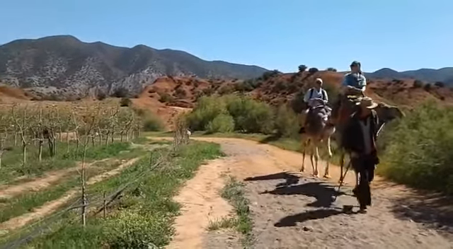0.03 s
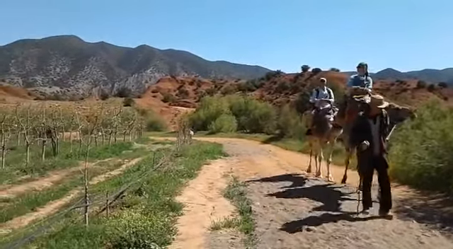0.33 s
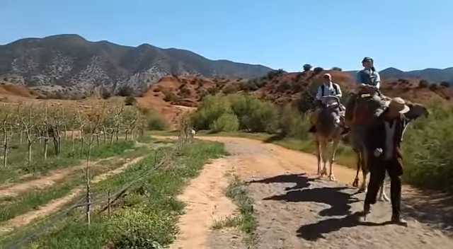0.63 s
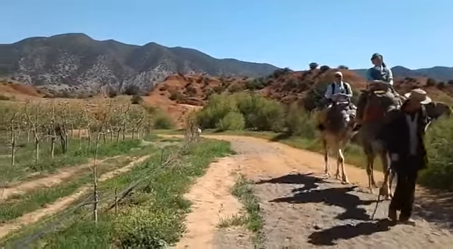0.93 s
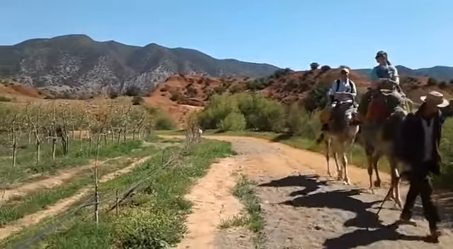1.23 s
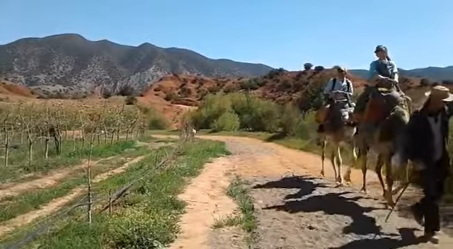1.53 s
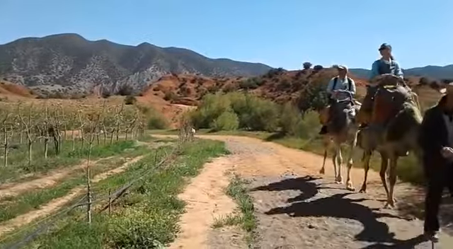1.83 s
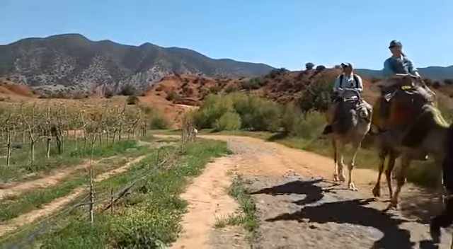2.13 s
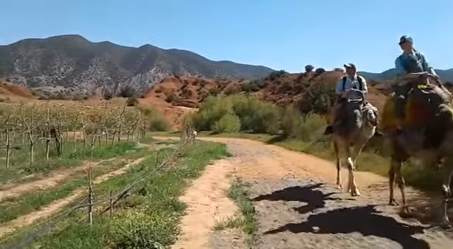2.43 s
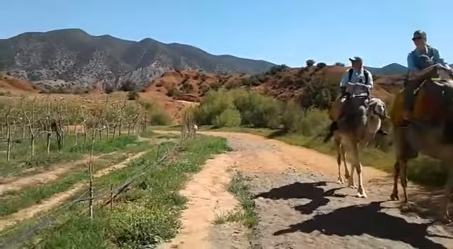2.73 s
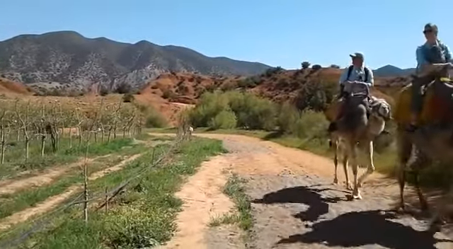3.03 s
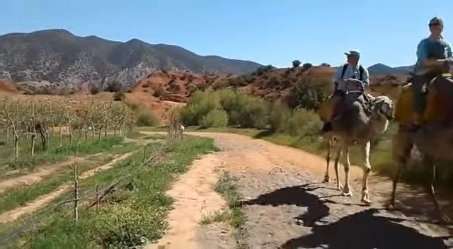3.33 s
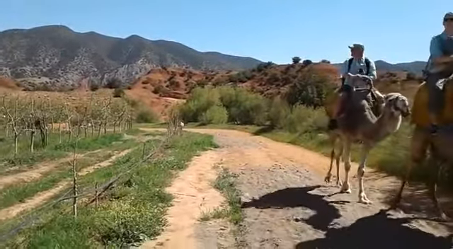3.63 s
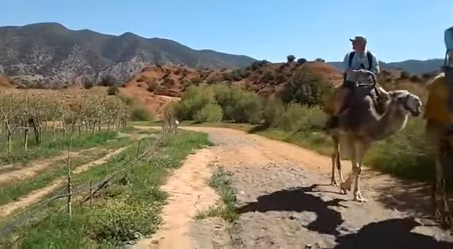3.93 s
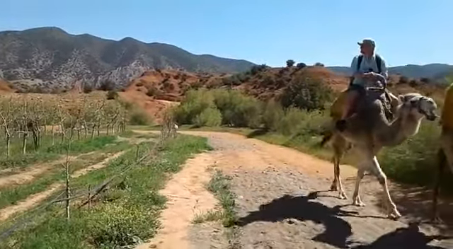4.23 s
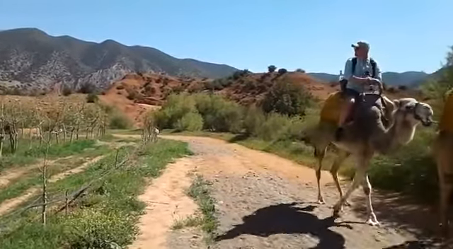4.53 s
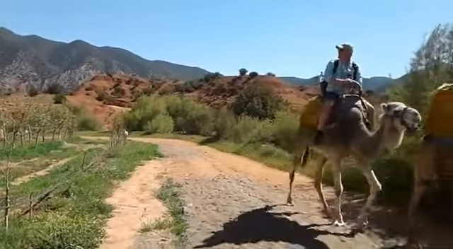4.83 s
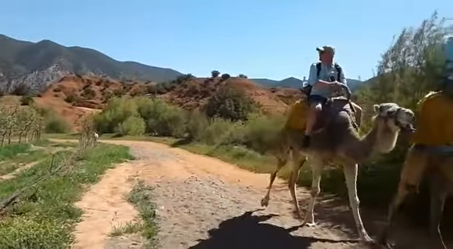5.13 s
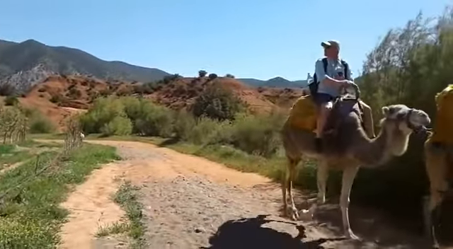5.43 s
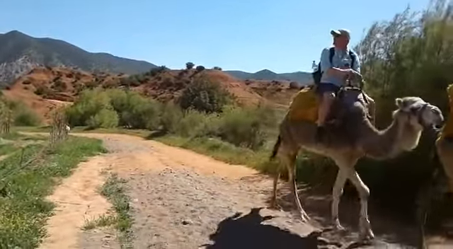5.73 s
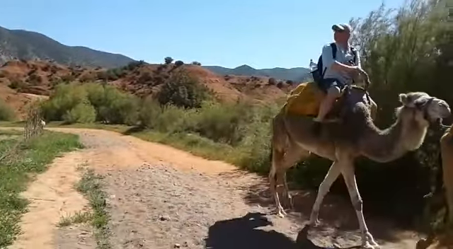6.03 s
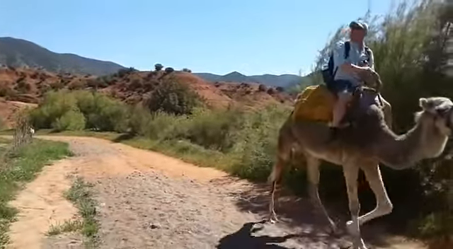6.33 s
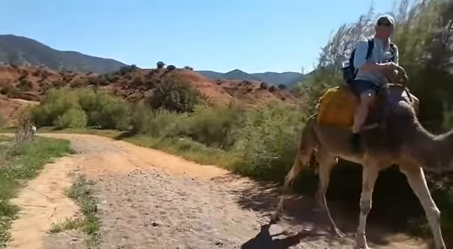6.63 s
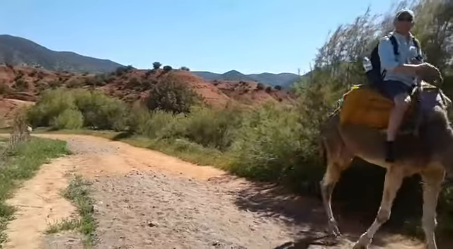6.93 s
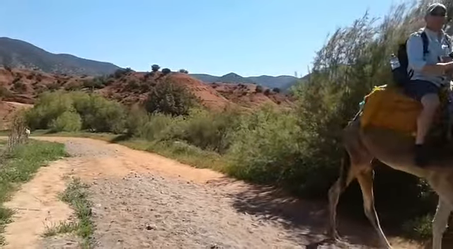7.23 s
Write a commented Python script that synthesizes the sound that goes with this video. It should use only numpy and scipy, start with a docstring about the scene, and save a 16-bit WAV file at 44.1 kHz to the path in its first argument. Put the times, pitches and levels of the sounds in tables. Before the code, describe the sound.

Camels and a person walk on a stony track with short crunching steps, while a small bird chirps and light wind rumbles.

```python
"""Camels and a man on foot walk past on a stony track in open country. Each footfall loads stones, gravel
and sand, whose many small impacts excite damped resonances; trapped stones rattle and pebbles snap.
In the bushes a finch sings a fast jingle of frequency sweeps from the two sides of its syrinx.
Far off a frog or toad croaks in amplitude-modulated pulses, and over a faint hush of air
the turbulent pressure of gusts rumbles on the microphone."""
import sys
import numpy as np
from scipy import signal
from scipy.fft import rfft, irfft
from scipy.io import wavfile
from scipy.ndimage import uniform_filter1d

SR = 44100
rng = np.random.default_rng(int(sys.argv[2]) if len(sys.argv) > 2 else 0)


def wav_record(signal):
    """Record a signal, one row per channel, as 16-bit PCM in the file named by sys.argv[1]."""
    frames = np.transpose(np.atleast_2d(signal))
    bounded = np.clip(frames, -1, 1)
    # unit amplitude maps onto the largest positive 16-bit level
    quanta = np.round(bounded * 32767).astype(np.int16)
    wavfile.write(sys.argv[1], SR, quanta)


N = 321048
T = np.arange(N) / SR

# the finch's jingles: start_s, gain_db, tilt_db_per_2khz
JINGLES = [(0.556,-15,-0.5), (2.917,-0.5,-0.5), (6.771,-15.5,-4)]


def undb(db):
    """Decibels to amplitude ratio."""
    return 10 ** (np.asarray(db) / 20)


def curve(rows):
    """Linear interpolation between rows of time_s, value."""
    return np.interp(T, *np.transpose(rows))


def unit(x):
    """Normalisation to rms 1."""
    return x / np.sqrt(np.mean(x ** 2))


def add(out, start_s, x):
    """Superposition of x on out from start_s."""
    i = max(int(start_s * SR), 0)
    out[i:i + len(x)] += x[:max(N - i, 0)]


def noise():
    """White Gaussian noise of rms 1."""
    return rng.standard_normal(N)


def wander(first_hz, second_hz):
    """Slow fluctuation of rms 1: noise through two moving averages, each one period long."""
    return unit(uniform_filter1d(uniform_filter1d(noise(), SR // first_hz), SR // second_hz))


def colour(x, points):
    """Minimum-phase filter of unit power gain, shaped by points of frequency_hz, relative_db."""
    hz, db = np.transpose(points)
    grid = np.maximum(np.fft.rfftfreq(8192, 1 / SR), 1)
    cepstrum = irfft(np.log(undb(np.interp(np.log(grid), np.log(hz), db))))
    half = len(cepstrum) // 2
    cepstrum[1:half] *= 2
    cepstrum[half + 1:] = 0
    response = irfft(np.exp(rfft(cepstrum)))[:half]
    return signal.fftconvolve(x, response / np.linalg.norm(response))[:N]


def ring(x, hz, q):
    """Response of one damped resonator."""
    return signal.lfilter(*signal.iirpeak(hz, q, fs=SR), x)


def steady(x, span_s):
    """Division by the running rms evens the power and leaves the finer grain."""
    power = np.abs(uniform_filter1d(x ** 2, int(span_s * SR)))
    return x / np.sqrt(power + 1e-9)


def taper(u, edge):
    """Envelope with quarter-sine ends, each a share `edge` of u from 0 to 1."""
    return np.sin(np.pi / 2 * np.clip(np.minimum(u, 1 - u) / edge, 0, 1))


def chirp(hz, overtone_db):
    """A tone and its second harmonic; phase is the integral of frequency."""
    phase = 2 * np.pi * np.cumsum(hz) / SR
    return np.sqrt(2) * (np.sin(phase) + undb(overtone_db) * np.sin(2 * phase))


def scatter(x, t60_s, wet_db):
    """Diffuse reflection from bushes and banks: an exponentially decaying tail."""
    t = T[:SR // 2]
    tail = rng.standard_normal(len(t)) * undb(-60 * t / t60_s) * (t > .004)
    return undb(wet_db) * signal.fftconvolve(x, tail / np.linalg.norm(tail))[:N]


def grains(per_s, spread_db, rub, q, sizes=18):
    """Random impacts, many weak and a few strong, ring particles of each size over friction noise."""
    out = np.zeros(N)
    hits = int(per_s * N / SR / sizes)
    for hz in np.geomspace(300, 15000, sizes):
        when, force, sign = rng.random((hits, 3)).T
        impact_db = spread_db * np.minimum(-np.log(1 - force), 4)
        clicks = np.zeros(N)
        clicks[(when * N).astype(int)] = np.sign(sign - .5) * undb(impact_db)
        out += ring(clicks, hz, q)
    return steady(unit(out) + rub * noise(), span_s=0.02)


def far_air():
    """Ambient hush as (mid, side); uncorrelated noises give it a little width."""
    # spectrum of the hush: frequency_hz, relative_db
    mid_spectrum = [(25,-20.5), (60,-12.5), (116,-29.5), (274,-25), (582,-27), (826,-25), (1500,-29.5),
                    (2630,-31.5), (3440,-35.5), (4870,-33.5), (6210,-51.5), (9810,-40.5), (15500,-41)]
    side_spectrum = [(60, -7), (600, 5), (1500, 0.5), (4000, -7.5), (8000, -19), (13000, -8)]
    return undb(-70) * colour(noise(), mid_spectrum), undb(-80.5) * colour(noise(), side_spectrum)


def wind(calm_db=-89, flutter_db=3.5, sag_db_per_s=20, edge_db_per_s=394):
    """Turbulent pressure: gusts swell and sag, and buffets shed smaller eddies of higher frequency."""
    # gusts: start_s, strongest_s, end_s, level_db, small_eddies_db
    gusts = [(0,0.016,0.73,-56,-19), (.65,.8,1.08,-58.5,-30), (1.536,1.933,2.1,-55,-10),
             (2.262,2.34,2.36,-64,-16), (2.59,2.617,2.83,-52.5,-20), (2.893,3.052,3.26,-53,-15.5),
             (3.328,3.844,4.33,-41.5,-16.5), (4.406,4.43,4.63,-53,-23.5), (5.782,6.1,6.7,-54.5,-21.5),
             (6.7,7.035,7.05,-61,-24)]
    # sharp buffets: centre_s, half_length_s, level_db
    buffets = [(0.027,0.017,-43.5), (1.651,0.008,-42.5), (1.935,.012,-47), (2.34,0.0066,-47.5),
               (2.585,0.0048,-49), (2.943,0.01,-40), (3.214,0.016,-38.5), (3.407,0.018,-32.5),
               (4.439,.025,-47), (4.602,0.025,-49), (6.2,0.017,-52)]
    # spectrum of the large eddies: frequency_hz, relative_db
    large_spectrum = [(25,-77), (50,-10), (80,7.5), (120,8), (170,3.5), (225,-6), (300,-20), (400,-28.5),
                      (700,-51.5), (1300,-82)]
    small_spectrum = [(100, -21.5), (220, 6.5), (320, -4), (450, -18), (800, -30), (2000, -72)]
    gust = np.full(N, undb(calm_db))
    for start, strongest, end, db, _ in gusts:
        outside_s = np.abs(T - np.clip(T, start, end))
        gust += undb(db - sag_db_per_s * np.abs(T - strongest) - edge_db_per_s * outside_s)
    gust *= undb(flutter_db * wander(37, 37))
    for centre, half, db in buffets:
        gust = np.maximum(gust, undb(db) * np.exp(-((T - centre) / half) ** 2))
    small_share = undb(curve([(strongest, db) for _, strongest, _, _, db in gusts]))
    large = steady(colour(noise(), large_spectrum), span_s=0.0282)
    small = small_share * steady(gust, span_s=0.2) * colour(noise(), small_spectrum)
    return signal.sosfilt(signal.butter(2, 60, "high", fs=SR, output="sos"), gust * (large + small))


def croaks(pulses_per_s=28.5):
    """A distant frog or toad: amplitude modulation divides a hollow tone into even pulses."""
    # croaking trills: start_s, length_s, pitch_hz, level_db
    trills = [(4.785,0.47,565.5,-70.5), (6.219,0.42,558,-70.5), (6.862,0.055,594,-65.5),
              (7.067,0.21,582,-68.5)]
    out = np.zeros(N)
    for start, length, hz, db in trills:
        t = T[:int(length * SR)]
        pulses = np.sin(np.pi * pulses_per_s * t) ** 2
        tone = chirp(hz * (1 + 0.0294 * pulses), overtone_db=-45)
        add(out, start, undb(db) * pulses ** 2 * taper(t / length, edge=0.052) * tone)
    return out


def excerpt(x, length_s):
    """A randomly chosen stretch of x."""
    return x[rng.integers(N // 2):][:int(length_s * SR)]


def jingle_notes(wobble, unevenness=0.43):
    """Two-voice song: one side of the syrinx sweeps repeatedly downward, the other upward."""
    # syllables of each voice: delay_s, length_s, sweeps_per_s, level_db
    low_voice = [(0.073,0.025,100,-49.5), (0.097,0.049,99,-46.5), (.158,.063,280,-47),
                 (0.224,0.072,130,-50), (.298,0.061,260,-46.5), (.36,.044,75,-49), (0.407,.045,110,-46.5)]
    high_voice = [(.005,0.078,60,-56), (0.146,0.0089,160,-46.5), (0.223,0.011,59,-48), (0.251,0.046,85,-49),
                  (.362,.042,165,-48.5)]
    for start, song_db, tilt_db in JINGLES:
        for first_hz, last_hz, syllables in (6090, 4940, low_voice), (6650, 8000, high_voice):
            for delay, length, rate, db in syllables:
                drift = excerpt(wobble, length)
                u = np.linspace(0, 1, len(drift))
                turns = np.cumsum(rate * (1 + unevenness * drift)) / SR
                sweep = turns % 1
                jitter = rng.standard_normal(64)[turns.astype(int) % 64]  # one value per sweep
                hz = (first_hz + (last_hz - first_hz) * sweep ** .8) * (1 + .03 * drift + .014 * jitter)
                gain = undb(tilt_db * (hz - 5500) / 2000 + 1.8 * drift + 1.5 * jitter)
                envelope = gain * taper(u, edge=0.061) * taper(sweep, edge=0.35)
                yield start + delay, db + song_db, envelope * chirp(hz, overtone_db=-21)


def whistle_score(flick_gap_s=0.014, trill_gap_s=0.0312, slowing_s=0.0023):
    """The finch's frequency glides, as rows of start_s, level_db, shape."""
    # distant pips, lone slurs and two-part calls: start_s, level_db
    pips = [(.008,-57), (1.106,-62), (1.134,-61), (2.549,-64), (2.583,-60), (2.614,-63), (4.708,-61.5),
            (4.74,-61), (5.88,-60), (6.693,-67), (6.922,-59)]
    slurs = [(2.171,-57.5)]
    calls = [(2.346,-50.5), (2.485,-47.5), (2.62,-46), (2.731,-48)]
    # a held note and a run of flicks: start_s, run_length_s, level_db
    flourishes = [(3.485,0.04,-42.5), (3.578,0.076,-44), (3.7,0.0053,-47)]
    # shapes: length_s, first_hz, middle_hz, last_hz
    pip, slur = (0.0183, 4520, 4060, 3740), (0.025, 8000, 6350, 5100)
    slide, hook = (0.017, 6600, 5330, 4830), (0.0113, 8300, 6150, 6600)
    held, flick = (0.0248, 5650, 5550, 5000), (0.012, 7550, 6600, 4440)
    trill_first, trill_last = (0.015, 6500, 6700, 4200), (0.019, 7800, 7300, 6700)
    undertone = (0.0095, 5200, 4800, 4700)
    notes = [(s, db, pip) for s, db in pips]
    notes += [(s, db, slur) for s, db in slurs]
    notes += [(s + 0.446, db - 42, slur) for s, db, _ in JINGLES]  # a slur closes each jingle
    for s, db in calls:
        notes += [(s, db, slide), (s + 0.02, db - 4, hook)]
    for s, length, db in flourishes:
        notes.append((s, db, held))
        notes += [(s + 0.022 + k * flick_gap_s, db, flick) for k in range(round(length / flick_gap_s))]
    # the trill slows, rises, swells and fades over a faint second voice
    stroke_s = 3.724
    for k, u in enumerate(np.linspace(0, 1, 11)):
        shape = (1 - u) * np.array(trill_first) + u * np.array(trill_last)
        fade_db = -5.5 * (2 * u - 1) ** 2
        notes += [(stroke_s, -42 + fade_db, shape), (stroke_s, -58 + 2 * fade_db, undertone)]
        stroke_s += trill_gap_s + k * slowing_s
    return notes


def whistle_notes(wobble, waver=0.024):
    """Nearly pure tones glide along parabolas of frequency, wavering slightly."""
    for start, db, (length, *pitches) in whistle_score():
        drift = excerpt(wobble, length)
        u = np.linspace(0, 1, len(drift))
        hz = np.polyval(np.polyfit([0, .5, 1], pitches, 2), u)
        hz *= 1 + waver * drift + .01 * rng.standard_normal()
        yield start, db, taper(u, edge=0.31) * undb(1.5 * drift) * chirp(hz, overtone_db=-28)


def buzz_notes(wobble, flutter_hz=200):
    """Fast modulation of amplitude and frequency adds sidebands, heard as a buzz."""
    # buzzy notes: start_s, length_s, pitch_hz, level_db
    buzzes = [(.169,.023,4800,-67.5), (.268,.02,5000,-69), (0.44,.045,5400,-70.5), (0.666,0.048,5250,-58.5),
              (1.782,0.15,5600,-74.5), (3.432,0.056,5400,-45), (3.978,0.026,4000,-61),
              (5.116,.024,3680,-63.5), (6.765,.08,5730,-65), (6.825,0.1,5360,-57.5),
              (7.056,0.082,5300,-63.5)]
    for start, length, hz, db in buzzes:
        t = T[:int(length * SR)]
        flutter = np.sin(2 * np.pi * flutter_hz * t)
        tone = chirp(hz * (1 + 0.04 * flutter + 0.025 * excerpt(wobble, length)), overtone_db=-22)
        yield start, db, taper(t / length, edge=0.26) * (1 + 0.2 * flutter) * tone


def finch(echo_db_per_db=0.23):
    """Direct song plus reflections: faint notes are farther off, so more of their sound is echo."""
    direct, echo = np.zeros(N), np.zeros(N)
    wobble = unit(colour(noise(), [(100, -9), (500, -2), (1500, -30)]))

    def sing(notes):
        for start, db, note in notes:
            add(direct, start, undb(db) * note)
            add(echo, start, undb(db + echo_db_per_db * np.clip(-33 - db, 0, 20)) * note)

    sing(jingle_notes(wobble))
    # nonlinear coupling of the jingle's two voices adds their sum tone
    sum_tone = undb(41.5) * ring(ring(direct ** 2, hz=13800, q=4.7), hz=13100, q=10)
    sing(whistle_notes(wobble))
    sing(buzz_notes(wobble))
    lingering = undb(-13.5) * ring(direct, hz=5450, q=32)
    twigs = scatter(direct, t60_s=0.038, wet_db=-16)
    banks = scatter(echo, t60_s=0.28, wet_db=-15.5)
    return undb(-1) * direct + lingering + sum_tone + twigs + banks


def loose_grit(clump_db=2.5):
    """Friction of grit in little slides between footfalls, louder as the animals come close."""
    # course of the rustle: time_s, relative_db
    levels = [(0,-71), (1.2,-66), (1.8,-68), (2.6,-65.5), (3,-61), (3.5,-58.5), (4.4,-59), (5.2,-63),
              (6,-59.5), (6.55,-61), (7.28,-59)]
    spectrum = [(150, -41), (500, -10), (1500, -10.5), (3000, -9), (5000, -3.5), (7500, -11),
                (9300, -3), (10100, 2), (11000, -5), (12500, -13.5), (15500, -17.5)]
    envelope = undb(curve(levels) - 2 + clump_db * wander(60, 90))
    return colour(envelope * grains(per_s=4000, spread_db=4.5, rub=1.44, q=7.4), spectrum)


def pebbles(ring_s=0.00038, crack_s=0.0038):
    """A hard impact gives a few cycles of damped ringing and a short crack of noise."""
    # pebbles snapping together: start_s, level_db, pitch_hz
    snaps = [(1.287,-34,2520), (1.2884,-45,6630), (1.4904,-21.5,10200), (1.4942,-41,9250),
             (2.821,-30,10000), (3.421,-37,9750), (3.6525,-21,10000), (3.67,-27,9800), (3.856,-32,10100),
             (4.754,-36.5,9850), (4.8749,-32,9400), (5.004,-32.5,10300), (5.506,-36,10000),
             (6.4689,-34,6000)]
    out, t = np.zeros(N), T[:SR // 50]
    for start, db, hz in snaps:
        tone = np.sin(2 * np.pi * hz * t) * np.exp(-t / ring_s)
        crack = 0.11 * rng.standard_normal(len(t)) * np.exp(-t / crack_s)
        add(out, start, undb(db) * (tone + crack))
    return out


def rattles(knocks_per_s=900, fade_s=0.013):
    """Repeated impacts on its neighbours excite one resonance of a trapped stone."""
    # larger stones under a foot: start_s, pitch_hz, level_db
    trapped_stones = [(.031,4600,-47.5), (.61,2770,-54), (1.358,1900,-48), (1.4902,644,-56.5),
                      (1.4904,2870,-54.5), (2.127,2800,-58), (2.13,4800,-54), (3.243,3100,-51),
                      (3.41,810,-47.5), (3.466,930,-49), (5.41,2100,-54.5), (6.177,2400,-51.5),
                      (6.957,1830,-51), (6.973,2500,-44.5)]
    out, t = np.zeros(N), T[:SR // 8]
    for start, hz, db in trapped_stones:
        contacts = rng.random(len(t)) < knocks_per_s / SR
        knocks = contacts * rng.standard_normal(len(t)) * np.exp(-t / fade_s)
        knocks[0] += 1.5
        tone = ring(knocks, hz, q=7)
        add(out, start, undb(db) * tone * np.sqrt(fade_s * SR / 2 / np.sum(tone ** 2)))
    return out


def footsteps(rise_share=0.42, sharpness=1.82, settle_s=0.14, settle_db=-14):
    """Granular noise follows each foot's load, then the ground settles; incoherent sounds add in power."""
    # footfalls and scuffs: peak_s, length_s, stones_db, gravel_db, sand_db
    steps = [(0.03,0.04,-72,-70,-59), (0.073,0.055,-68,-74,-69.5), (0.391,0.023,-80,-57.5,-72),
             (0.565,0.05,-61.5,-63.5,-62), (0.616,0.075,-64,-59.5,-55), (.8,.16,-72,-66,-61),
             (1.036,0.083,-70,-76,-65), (1.32,.05,-58.5,-62.5,-57), (1.365,0.03,-52.5,-59,-57),
             (1.415,0.093,-70.5,-69.5,-68), (1.482,0.052,-65.5,-64,-62), (1.603,0.026,-68,-64,-85),
             (1.957,0.11,-76,-72,-67.5), (2.053,.05,-64,-73,-58), (2.127,.01,-74,-55,-48),
             (2.14,0.038,-58,-53.5,-47), (2.375,0.032,-70.5,-66,-71), (2.731,0.015,-57.5,-62,-53.5),
             (2.796,0.086,-65.5,-67.5,-63.5), (2.9,0.062,-61,-61.5,-58.5), (2.958,0.072,-68,-65.5,-52.5),
             (3.24,0.055,-63.5,-59.5,-52), (3.296,0.02,-80,-56,-64), (3.419,0.04,-51,-65,-46),
             (3.472,0.021,-52.5,-57,-46), (3.492,0.027,-56.5,-59,-46), (3.633,0.072,-57.5,-63.5,-53.5),
             (3.8,0.033,-66,-55.5,-50.5), (4.062,0.039,-66.5,-62.5,-56), (4.1,.029,-76,-55.5,-74),
             (4.14,0.05,-61.5,-76,-54), (4.264,0.15,-63.5,-67.5,-57.5), (4.847,0.041,-77,-59.5,-51),
             (4.865,0.042,-68,-66,-46), (4.878,0.01,-78,-76,-40), (4.997,0.058,-64.5,-72,-67),
             (5.026,0.025,-76,-63,-45.5), (5.292,0.051,-68,-71,-65), (5.415,0.039,-62,-61,-51.5),
             (5.438,.017,-59,-61,-61), (5.524,0.036,-60.5,-76,-72), (5.651,0.064,-67,-65.5,-61),
             (5.721,0.0096,-76,-68,-51.5), (5.743,0.053,-70,-60,-49), (5.79,0.02,-56.5,-60.5,-54.5),
             (5.891,0.034,-64.5,-65,-64), (6.184,0.02,-50.5,-57,-51), (6.267,0.035,-61,-66,-57),
             (6.464,0.026,-81,-75,-61), (6.692,0.034,-65.5,-65,-66), (6.901,0.048,-75,-64,-49.5),
             (6.962,0.019,-62,-53,-59), (6.984,0.077,-59,-64,-55.5)]
    # spectra of dull stones, mid gravel and bright sand, with the microphone ringing near 10 kHz:
    # frequency_hz, relative_db
    stone_spectrum = [(150,-29.5), (400,-8), (800,-2.5), (1500,-5), (2100,-5), (3200,-7), (6000,-46.5)]
    gravel_spectrum = [(900,-31), (1700,-7.5), (2600,0), (4000,2.5), (5200,5), (6800,-6.5), (9000,-13.5),
                       (15000,-21)]
    sand_and_microphone = [(3000,-19), (5500,-10), (8200,-12.5), (9300,-2.5), (10000,1.5), (11000,-8),
                           (12500,-11), (15500,-21.5)]
    power = np.zeros((3, N))
    for peak, length, *db in steps:
        near = slice(max(int((peak - 2 * length) * SR), 0), int((peak + 1) * SR))
        t = T[near] - peak
        rising = -t / (rise_share * length)
        falling = t / ((1 - rise_share) * length)
        load = undb(-10 * np.maximum(rising, falling) ** sharpness)
        settling = undb(settle_db - 10 * np.maximum(rising, t / settle_s) ** sharpness)
        power[:, near] += np.outer(undb(db) ** 2, load ** 2 + settling ** 2 * length / 0.065)
    stones = colour(grains(per_s=4000, spread_db=4.5, rub=.25, q=8, sizes=25), stone_spectrum)
    gravel = colour(grains(per_s=7000, spread_db=4.2, rub=.2, q=10, sizes=32), gravel_spectrum)
    sand = colour(grains(per_s=8000, spread_db=4.0, rub=.6, q=2.1), sand_and_microphone)
    stone_load, gravel_load, sand_load = np.sqrt(power)
    return (undb(0.33) * stone_load * steady(stones, span_s=0.048)
            + undb(4.5) * gravel_load * steady(gravel, span_s=0.03)
            + undb(1) * sand_load * sand)


def scene():
    """Mid-side stereo: the sources add in the centre, and only the far air has width."""
    ground = footsteps() + rattles() + loose_grit() + pebbles()
    air, side = far_air()
    mid = ground + scatter(ground, t60_s=0.18, wet_db=-26) + finch() + croaks() + wind() + air
    return np.array([mid + side, mid - side])


def record(dry, cutoff_hz=15850, offset=-0.00043):
    """A steep low-pass filter cuts the top treble; the signal rests slightly off zero."""
    return signal.sosfilt(signal.ellip(10, .2, 70, cutoff_hz, fs=SR, output="sos"), dry) + offset


dry = scene()
out = record(dry)
wav_record(out)
```